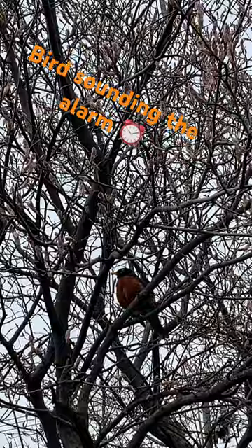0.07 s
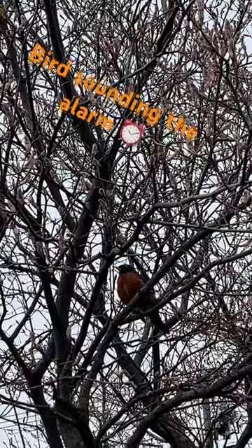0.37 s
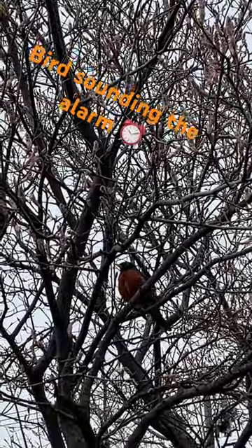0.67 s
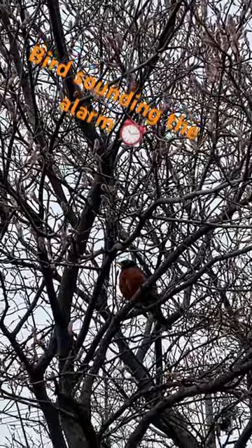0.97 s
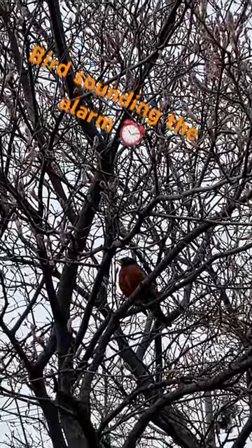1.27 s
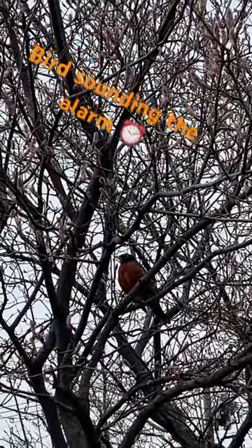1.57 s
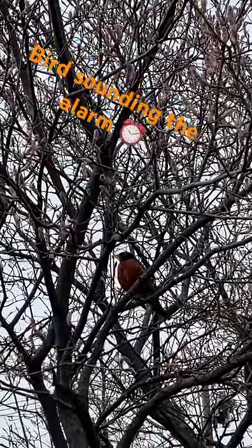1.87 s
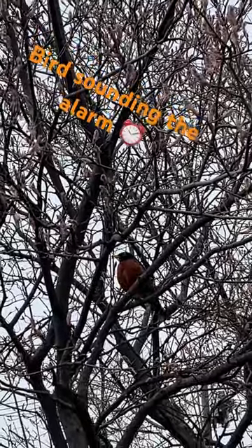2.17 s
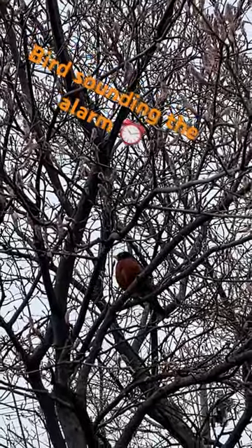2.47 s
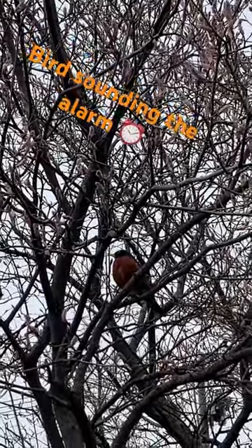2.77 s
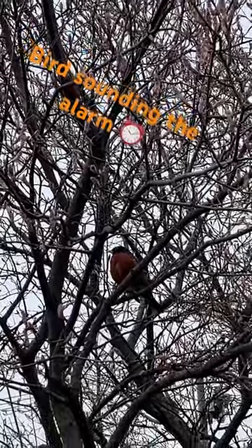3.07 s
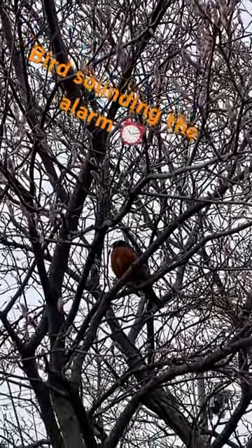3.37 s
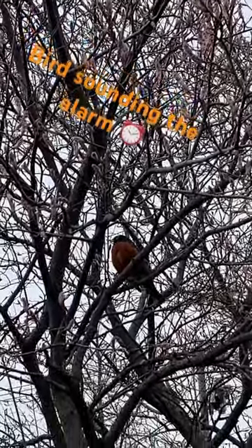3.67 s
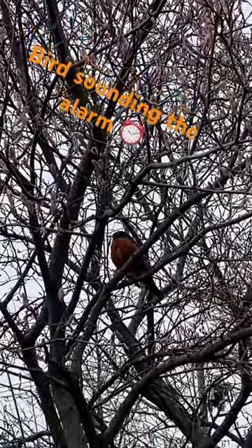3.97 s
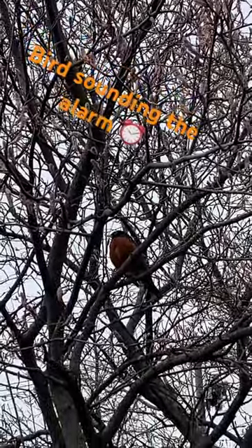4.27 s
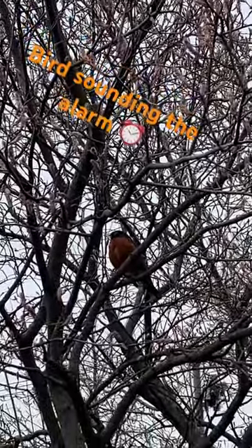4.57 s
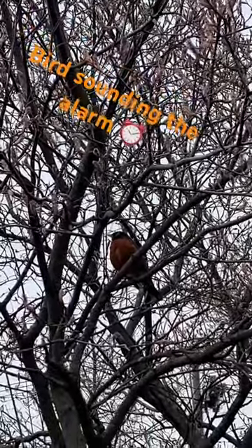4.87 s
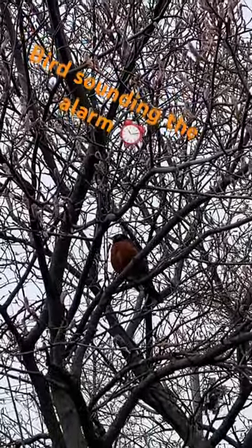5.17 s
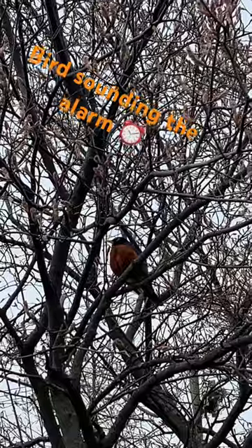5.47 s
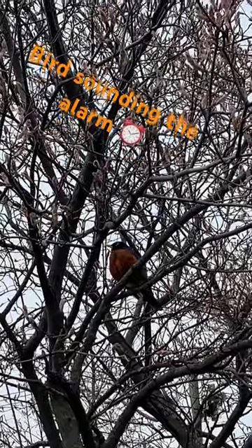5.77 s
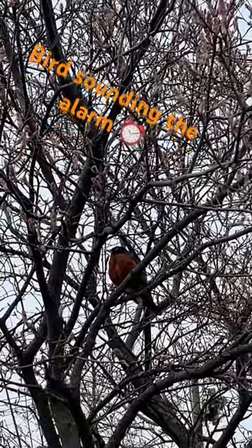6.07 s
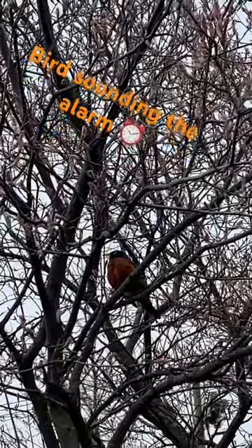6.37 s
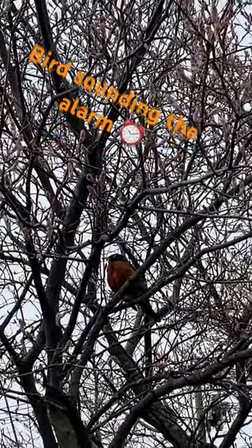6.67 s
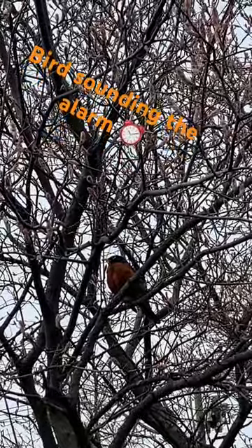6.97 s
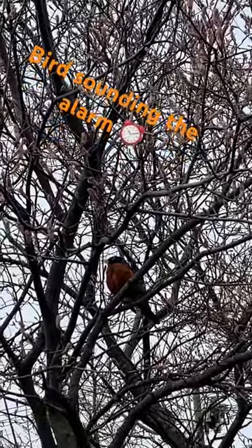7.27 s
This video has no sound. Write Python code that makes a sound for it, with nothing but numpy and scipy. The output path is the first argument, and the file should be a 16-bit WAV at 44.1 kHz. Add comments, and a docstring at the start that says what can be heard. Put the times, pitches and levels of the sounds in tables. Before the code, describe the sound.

Distant road noise and a low, gusty rumble of wind on the microphone run under an outdoor scene. Early on, a bird fires off ten rapid, piercing, slightly raspy notes that echo lightly among the trees. Small birds further away reply with brief high twitters. Cars swell past in the distance with a hiss of tyres, and as they fade a few soft chirps follow.

```python
"""A thrush in a bare tree gives a quick volley of ten alarm notes. It sings each one with both sides
of its voice box (the syrinx) at once, so a lower and an upper voice sound together.
A thin, high twitter answers twice from further off; faint chirps and one soft note follow.
Twigs and trees echo the birds. Traffic roars in the distance, tyre hiss swells and drops away,
and a low rumble of wind and engines lies under it all."""
import sys
import numpy as np
from scipy import signal
from scipy.fft import rfft, irfft
from scipy.io import wavfile
from scipy.ndimage import uniform_filter1d

SR = 44100
rng = np.random.default_rng(int(sys.argv[2]) if len(sys.argv) > 2 else 0)


def digitize_waveform(pressure):
    """Quantize a signal to 16-bit integers and store it at the path in sys.argv[1].

    Rows of a 2-D input are taken as channels; values are limited to [-1, 1].
    """
    field = np.atleast_2d(pressure).T
    bounded = np.clip(field, -1, 1)
    quanta = np.round(bounded * 32767).astype(np.int16)
    wavfile.write(sys.argv[1], SR, quanta)


N = 331632
TIME = np.arange(N) / SR
BINS_HZ = np.arange(N // 2 + 1) * SR / N

# the tone colour of each noise: (frequency [Hz], relative level [dB])
WIND_COLOUR = [(22, -39), (32, -14), (45, -6.5), (62, 2.5), (85, -1.5), (120, -10), (170, -25),
               (300, -27.5)]
ENGINE_COLOUR = [(90, 1), (120, 0), (160, 1), (230, -4.5), (300, -8), (380, -18), (700, -47)]
DRONE_COLOUR = [(200, -25), (380, -8), (520, 1), (750, -0.5), (1100, -8.5), (2000, -30), (4000, -55)]
ROAR_COLOUR = [(450, -18.5), (750, -1), (1020, 2.5), (1500, -3.5), (2100, -11.5), (2800, -16.5),
               (3700, -18), (4800, -28), (7000, -41), (15000, -53.5)]
CAR_COLOUR = [(700, -7.5), (1150, 3.5), (1750, -2.5), (2150, -2.5), (2600, -23), (4000, -42)]
HISS_COLOUR = [(1500, -8), (2400, 8), (3100, 6), (3700, 13), (4600, 8.5), (5400, 12.5), (6200, 11),
               (7400, 2), (8600, 1), (10000, -7), (13500, -13), (15500, -22)]
RASP_COLOUR = [(2000, -1), (3500, 2), (5000, 5), (7000, 6), (9000, 4), (10500, 0), (13000, -2), (16000, -8)]
FIZZ_COLOUR = [(10000, -17), (11500, 9), (12800, 5), (14300, 11), (15700, 10)]
# how alike a noise is on the left and right: (frequency [Hz], likeness [0-1])
USUAL_LIKENESS = [(60, .8), (250, .83), (600, .8), (1200, .68), (2200, .61), (3000, .5), (3200, 1)]
WIND_STEREO_LIKENESS = [(40, 0.85), (130, 0.81), (300, 1), (700, 1)]
# how far the right channel lags the left: (frequency [Hz], lag [radians])
RIGHT_LAG = [(0, 0), (800, -.5), (1300, -.3), (2000, 1.6), (2430, 3.65), (2850, 3.4), (3300, 1.4),
             (3700, 1.35), (4700, 3.14), (8950, 9.42), (13100, 15.7), (15600, 18.85)]
# left-right balance: (frequency [Hz], left minus right [dB])
BALANCE = [(500, 0.1), (1750, -0.4), (2150, -5), (2600, -5), (3100, -2.5), (3800, 0.1)]

# the strength of the breeze: (time [s], level [dB])
BREEZE_LEVELS = [(0, -38.5), (2.3, -37.5), (3.9, -40.5), (5.85, -41.5), (6.75, -36.5), (7.3, -40)]
# gusts that buffet the microphone: (start [s], relative peak [dB])
GUST_PEAKS = [(0.397, -26), (1.083, -25), (2.359, -33), (3.099, -28), (3.471, -35), (4.582, -23),
              (4.878, -28), (5.104, -35), (6.608, -23.5), (6.803, -27)]
# far traffic: (time [s], engine rumble [dB], road drone [dB], tyre roar [dB])
TRAFFIC_LEVELS = [(0, -44, -45, -41.5), (1.3, -41, -43, -43), (3.2, -42, -45, -41.5),
                  (5.3, -44, -47.5, -45), (6.4, -42.5, -50.5, -45.5), (7.5, -45.5, -50.5, -47)]
# nearer cars: (time when closest [s], level [dB], time to fall to half [s], brightness [dB per octave])
CAR_PASSES = [(2.7, -50.5, 0.22, 12), (4.95, -43.5, 0.55, -3), (5.38, -42, 0.25, -4)]
# whistles further off: a small bird's twitter and chirps, then the thrush's soft note at 7.01 s # as two plain
# arches: (start [s], length [s], first pitch [Hz], middle pitch [Hz], last pitch [Hz],
FAR_WHISTLES = [(3.105, .04, 8400, 7200, 6200, 120, -55), (3.145, .066, 6400, 7750, 5600, 170, -48),
                (3.205, .075, 5800, 7300, 6000, 260, -51), (3.275, .062, 6400, 7250, 6200, 380, -52.5),
                (5.778, .05, 6700, 7100, 5900, 160, -61), (5.845, .068, 5900, 6850, 5400, 330, -56.5),
                (6.062, .045, 4500, 4000, 4200, 250, -61), (6.275, .025, 3970, 3700, 3300, 100, -59),
                (6.362, .05, 4450, 4600, 3900, 200, -60), (7.010, .085, 4300, 5060, 4700, 70, -56.5),
                (7.022, .075, 4400, 3350, 3150, 150, -57.5), (7.415, .077, 3850, 4500, 4700, 120, -62.5)]

# the thrush's notes: (start [s], run-up [s], length [s], lower pitch [Hz], upper pitch [Hz],
# opening scoop [0 = none], lower level [dB], lower level after its fall [dB], upper level [dB],
# lower shrillness [0-1], upper shrillness [0-1], rasp [dB], fizz [dB], trill depth [0-1])
ALARM_NOTES = [(0.951, .002, 0.046, 2340, 2540, 0, -48, -55, -47, 1, 0.65, -46, -64, .1),
               (1.037, 0.036, 0.046, 2250, 2510, 1.6, -48, -58, -45, 0.9, 0.9, -41, -58, .2),
               (1.121, .002, 0.046, 2270, 2553, .7, -38.5, -48, -42.5, 0.75, 0.98, -41, -58, 0.3),
               (1.205, .002, .044, 2293, 2510, .7, -39.5, -47, -43, 0.8, 0.8, -44, -58, .35),
               (1.285, .002, 0.045, 2270, 2436, .4, -42.5, -47, -49, 0.72, .45, -44, -64, 0.4),
               (1.371, .002, 0.049, 2256, 2380, .6, -43, -44, -53, 0.55, 0.6, -50, -62, .7),
               (1.461, .002, .046, 2340, 2450, .8, -41.5, -45.5, -48, 0.58, 0.3, -57, -58, 0.55),
               (1.548, .003, 0.05, 2330, 2430, .9, -37, -47, -46, 0.29, .2, -62, -58, 0.5),
               (1.652, .002, 0.046, 2374, 2436, 1, -36, -46, -46, 0, 0.1, -71, -58, 0.25),
               (1.751, .003, 0.047, 2340, 2430, 1.4, -37, -47, -45, 0.08, 0.05, -72, -64, 0.5)]
# the overtones of its two voices:
# (harmonic [number], lower mellow [dB], lower shrill [dB], upper mellow [dB], upper shrill [dB])
VOICE_OVERTONES = [(1, -20, -8, 3, 1.5), (2, 0, 0, -12, 12), (3, -20, 10.5, -22, -4),
                   (4, -29, -3, -35, -15), (5, -29, -9, -38, -17), (6, -23, -7, -34, -19),
                   (7, -26, -12, -40, -24)]
# pitch through a note, with the run-up before 0:
# (position [share of length], lower pitch [ratio], upper pitch when shrill [ratio])
NOTE_GLIDE = [(-.1, .78, .85), (0, .95, .92), (.1, .995, .95), (.22, 1, .97), (.38, .965, .995),
              (.56, .71, 1), (.76, .785, .99), (.88, .74, .9), (1.05, .6, .62)]
# loudness through a note: (position [share of length], lower voice [dB], upper voice [dB])
NOTE_SWELL = [(-.1, -19, -30), (0, -8, -22), (.14, 1, -11), (.3, 0.5, -6), (.42, -2, 0), (.55, -4, 0),
              (.78, 0, 0), (.9, -2, -5), (1.05, -11, -18)]


def from_db(db):
    """Turn decibels into a gain to multiply by."""
    return 10 ** (np.asarray(db) / 20)


def unit_power(x):
    """Scale a signal so that its average power is 1."""
    return x / np.sqrt(np.mean(x ** 2) + 1e-20)


def along(rows, where):
    """Look up `where` in a table's first column and read off the other columns."""
    first, *columns = np.transpose(rows)
    return [np.interp(where, first, column) for column in columns]


def at_hz(points):
    """Join a table's points into a curve over all frequencies, with octaves evenly spaced."""
    hz, value = np.transpose(points)
    return np.interp(np.log(BINS_HZ + 1), np.log(hz), value)


def drift(rate_hz):
    """A random wander of typical size 1, mostly slower than the given rate."""
    return unit_power(irfft(rfft(rng.standard_normal(N)) / (1 + (BINS_HZ / rate_hz) ** 2), N))


def noise(colour, likeness=USUAL_LIKENESS):
    """Stereo noise of the given colour, fading beyond the ends of its table."""
    shared, side = rfft(rng.standard_normal((2, N)))
    alike = np.clip(at_hz(likeness), -1, 1)
    low_cut = np.minimum(BINS_HZ / colour[0][0], 1) ** 2
    high_cut = np.minimum(colour[-1][0] / (BINS_HZ + 1), 1) ** 2
    stereo = np.sqrt(1 + alike) * shared + np.sqrt(1 - alike) * side * [[1], [-1]]
    return unit_power(irfft(stereo * from_db(at_hz(colour)) * low_cut * high_cut, N))


def wind(lump_db=2.0, gust_db=-7, rise_s=0.025, fall_s=0.038):
    """The breeze rumbles on the microphone in lumps; each gust adds a short thud."""
    breeze_db, = along(BREEZE_LEVELS, TIME)
    gusts = sum(from_db(db + gust_db) * np.interp(TIME - start, [0, rise_s, rise_s + fall_s], [0, 1, 0])
                for start, db in GUST_PEAKS)
    rumble = noise(WIND_COLOUR, WIND_STEREO_LIKENESS)
    steady_rumble = rumble / np.sqrt(uniform_filter1d(np.mean(rumble ** 2, axis=0), size=5000))
    return (from_db(breeze_db + lump_db * drift(19)) + gusts) * steady_rumble


def traffic(waver_db=1.0):
    """Far away, engines rumble, the road drones and tyres roar."""
    engines, drone, roar = from_db(along(TRAFFIC_LEVELS, TIME))
    road = drone * noise(DRONE_COLOUR) + roar * noise(ROAR_COLOUR)
    return road * from_db(waver_db * drift(22)) + engines * noise(ENGINE_COLOUR)


def cars():
    """Nearer cars swell as they come and fade as they go."""
    passing = 0
    for closest_s, db, half_s, brightness in CAR_PASSES:
        colour = [(hz, level + brightness * np.log2(hz)) for hz, level in CAR_COLOUR]
        passing += from_db(db) / (1 + ((TIME - closest_s) / half_s) ** 2) * noise(colour)
    return passing


def tyre_hiss(full_db=-55.5, rise_db_per_s=3.5, full_at_s=3.08, leaves_at_s=5.215, fade_s=0.32):
    """The hiss of tyres builds, holds, and drops away behind the last car."""
    building = from_db(full_db - rise_db_per_s * np.maximum(full_at_s - TIME, 0))
    leaving = 1 / (1 + (np.maximum(TIME - leaves_at_s, 0) / fade_s) ** 2)
    return building * leaving * noise(HISS_COLOUR)


def echoes(sound, decay_s):
    """Countless faint reflections blend into a tail that drops 60 dB in decay_s."""
    tail = noise([(1500, 3), (5000, 7), (9000, 4), (16000, -14.5)])
    tail *= from_db(-60 * TIME / decay_s) * np.minimum(TIME / 0.0021, 1)
    tail = tail[:, :SR] / np.sqrt(np.sum(tail ** 2) / 2)
    return signal.fftconvolve(sound[None], tail, axes=1)[:, :N]


def voice(pitch_hz, overtone_db):
    """One vibrating membrane in a bird's throat: a stack of harmonics on a gliding pitch."""
    phase = 2 * np.pi * np.cumsum(pitch_hz) / SR
    return sum(from_db(db) * np.sin(harmonic * phase + rng.uniform(0, 2 * np.pi))
               for harmonic, db in enumerate(overtone_db, 1))


def whistles(buzz_hz=170, shake_hz=110, flutter_db=3, echo_s=0.0085, echo_gain=0.33):
    """Thin, scratchy whistles arch up and down, with an echo from a branch."""
    out, flutter, shake = np.zeros(N), drift(200), drift(700)
    for start, length, first_hz, middle_hz, last_hz, buzz_depth_hz, db in FAR_WHISTLES:
        at = np.flatnonzero((TIME > start) & (TIME < start + length))
        t = TIME[at] - start
        slide = np.interp(t, [0, length], [first_hz, last_hz])
        arch = (middle_hz - (first_hz + last_hz) / 2) * np.sin(np.pi * t / length)
        buzz = buzz_depth_hz * np.sin(2 * np.pi * buzz_hz * t + flutter[at] / 2)
        octave_db = 2 * db + 23   # the overtone fades quickly in softer whistles
        whistle = voice(slide + arch + buzz + shake_hz * shake[at], [db, octave_db])
        out[at] += whistle * from_db(flutter_db * (flutter[at] - .5)) * signal.windows.tukey(len(at), .25)
    return out + echo_gain * np.interp(TIME - echo_s, TIME, out)


def thrush(trill_hz=317, trill_bend=0.0072, beak_db=7, shrill_range_db=22,
           flutter_db=2, early_rasp_db=-9, snap_db=-4, snap_s=0.0015):
    """Two membranes sing each note: the lower voice arches and falls, then the upper one takes over."""
    out = np.zeros(N)
    _, low_mellow, low_bright, up_mellow, up_bright = np.transpose(VOICE_OVERTONES)[:, :, None]
    steps_above_second = np.maximum(np.arange(len(VOICE_OVERTONES)) - 1, 0)[:, None]
    first_share, crest_share, last_share = NOTE_GLIDE[0][0], NOTE_GLIDE[3][0], NOTE_GLIDE[-1][0]
    low_shake, up_shake, flutter = drift(460), drift(500), drift(270)
    rasp, fizz = noise(RASP_COLOUR)[0], noise(FIZZ_COLOUR)[0]
    wobble = 1 + .008 * np.array([drift(69), drift(75)])   # no two notes bend quite alike
    up_flutter = drift(120)
    pulsing = np.sin(2 * np.pi * trill_hz * TIME + drift(60))
    for (start, run_up, length, low_hz, up_hz, scoop, low_db, fallen_db, up_db,
         low_shrill, up_shrill, rasp_db, fizz_db, trill) in ALARM_NOTES:
        at = np.flatnonzero((TIME > start - run_up) & (TIME < start + length * last_share))
        t = TIME[at] - start
        share = np.where(t < 0, -first_share * t / run_up, t / length)   # how far through the note
        low_ratio, up_ratio = along(NOTE_GLIDE, share) * wobble[:, at]
        low_ratio = low_ratio ** np.where(share < crest_share, scoop, 1)
        low_swell, up_swell = along(NOTE_SWELL, share)
        fallen = np.interp(share, [.33, .55], [0, 1])   # 1 once the lower voice has dropped
        # the membranes shake in the run-up, settle, then shake more as the note runs out
        shake = .007 + .02 * np.where(t < 0, 1, share ** 2)

        # the lower voice pulses quickly; the beak closes as it falls, and muffles it
        pulse = trill * pulsing[at]
        muffling_db = beak_db * (1 - low_ratio) * (t > 0) * steps_above_second
        low_pitch = low_hz * low_ratio * (1 + shake * low_shake[at] + trill_bend * pulse)
        low_overtones = low_mellow + low_shrill * (1 - fallen / 2) * (low_bright - low_mellow)
        lower = voice(low_pitch, low_overtones - muffling_db) * (1 + pulse)
        lower *= from_db(low_db + fallen * (fallen_db - low_db) + low_swell)

        # a mellow upper voice sags a little; a shrill one brightens as it swells, then plunges
        up_pitch = up_hz * up_ratio ** (.2 + .8 * up_shrill) * (1 + shake * up_shake[at] * 2 / 3)
        brightness = up_shrill * np.clip(1.5 + up_swell * (1 - fallen) / shrill_range_db, 0, 1) ** 2
        upper = voice(up_pitch, up_mellow + brightness * (up_bright - up_mellow))
        upper *= from_db(up_db + up_swell + flutter_db * (1.5 - up_shrill) * up_flutter[at])

        # rasping air grows once the lower voice falls, and fades at the end of the note
        air = from_db(np.maximum(low_swell / 2, up_swell) + early_rasp_db * (1 - fallen))
        air *= np.interp(share, [.8, 1.15], [1, 0])
        # air snaps through when the voice box opens suddenly
        snap = from_db(snap_db) * snap_s / max(run_up, snap_s) * np.exp(-np.abs(t) / snap_s) * (t > 0)
        breath = (air + snap) * from_db(rasp_db) * rasp[at] + from_db(fizz_db + low_swell) * fizz[at]

        note = np.sqrt(2) * (lower + upper) + breath
        out[at] += note * from_db(flutter_db * flutter[at]) * signal.windows.tukey(len(at), .08)
    return out


def scene():
    """Birds among twigs and trees, over the road and the breeze."""
    birds = thrush() + whistles()
    twigs = from_db(-13) * echoes(birds, decay_s=.085)
    trees = from_db(-19) * echoes(birds, decay_s=.5)
    return birds + twigs + trees + traffic() + cars() + tyre_hiss() + wind()


def record(dry, start_s=.036, fade_s=.002, cutoff_hz=15900):
    """A stereo-widening filter shifts phase and balance, spreading the treble; the very top is cut."""
    lag, = along(RIGHT_LAG, BINS_HZ)
    balance_db = at_hz(BALANCE)
    widening = np.array([from_db(balance_db / 2), from_db(-balance_db / 2) * np.exp(-1j * lag)])
    fades = np.clip(np.minimum(TIME - start_s, TIME[-1] - TIME) / fade_s, 0, 1)
    low_pass = 1 / np.sqrt(1 + (BINS_HZ / cutoff_hz) ** 200)
    return irfft(rfft(dry * fades) * widening * low_pass, N)


dry = scene()
out = record(dry)
digitize_waveform(out)
```